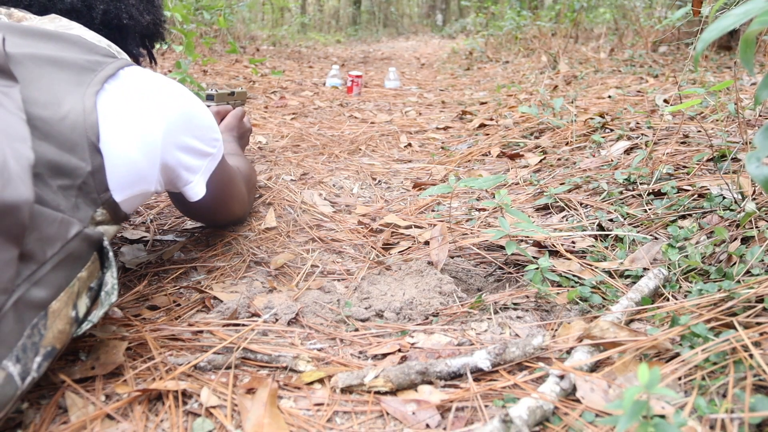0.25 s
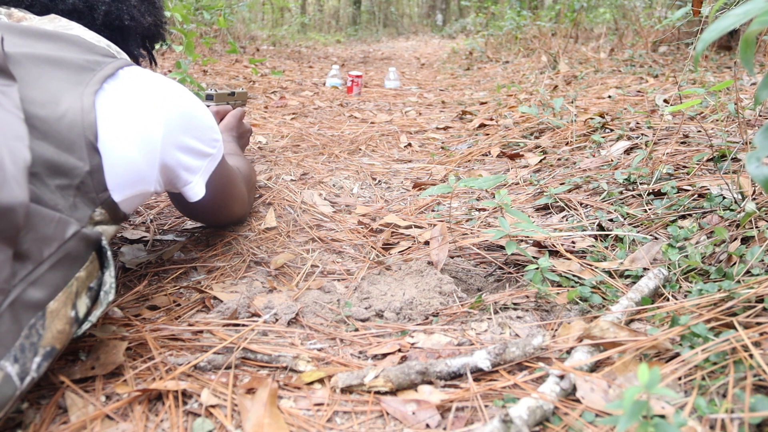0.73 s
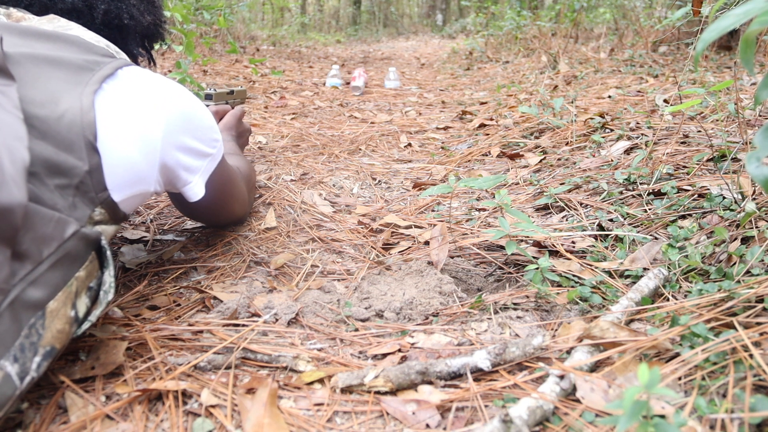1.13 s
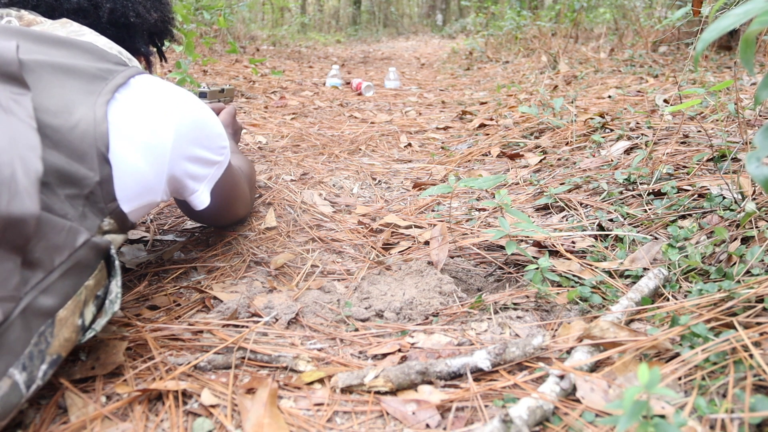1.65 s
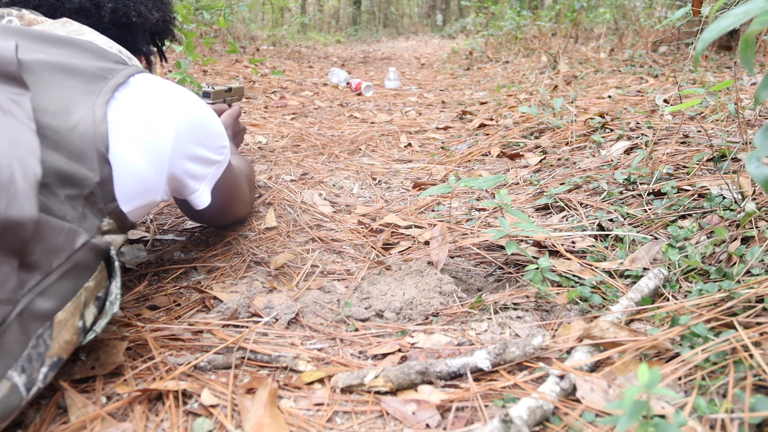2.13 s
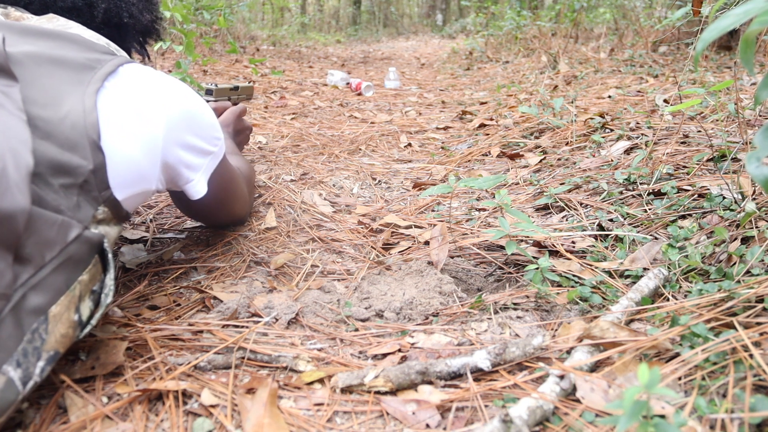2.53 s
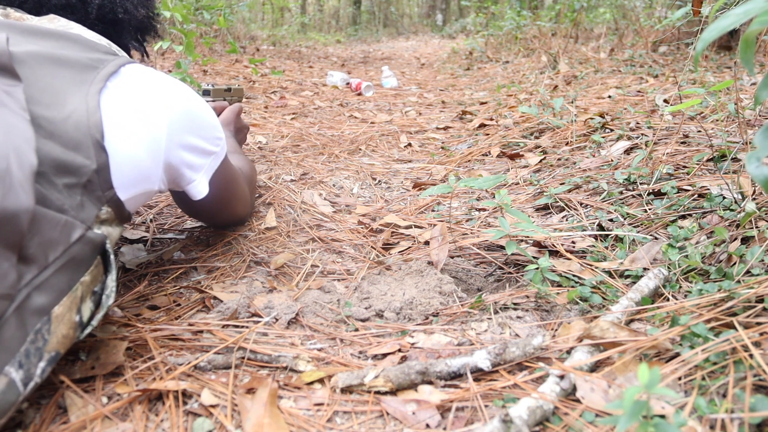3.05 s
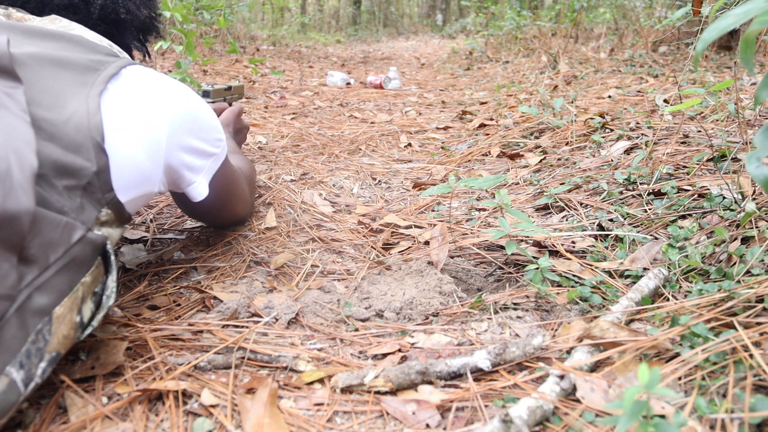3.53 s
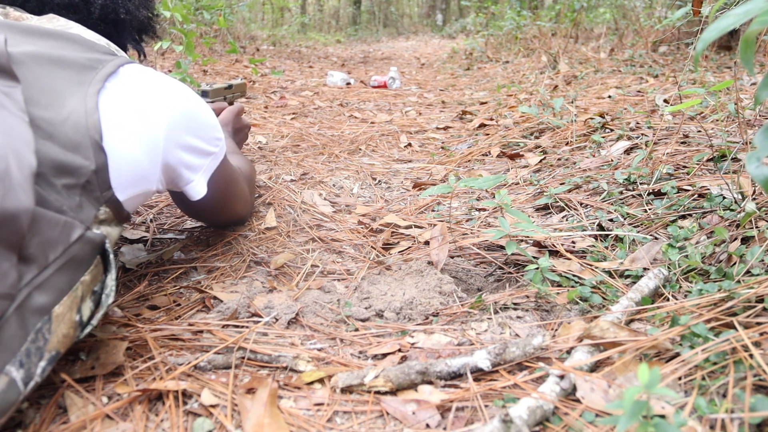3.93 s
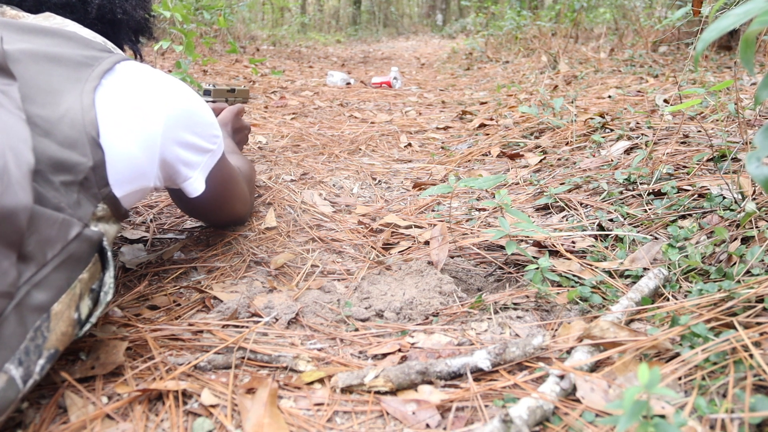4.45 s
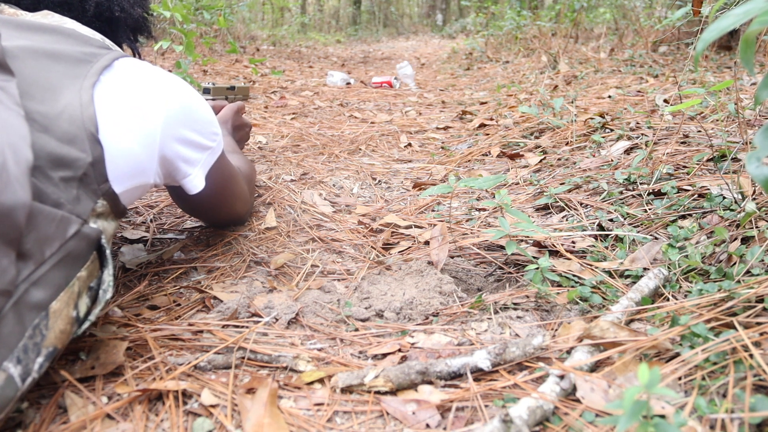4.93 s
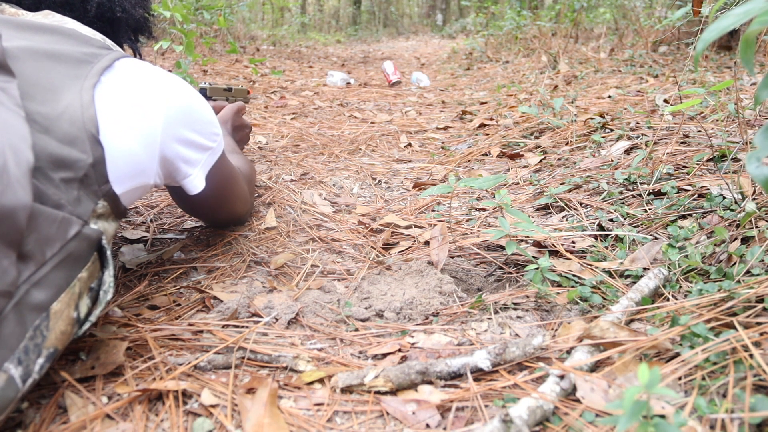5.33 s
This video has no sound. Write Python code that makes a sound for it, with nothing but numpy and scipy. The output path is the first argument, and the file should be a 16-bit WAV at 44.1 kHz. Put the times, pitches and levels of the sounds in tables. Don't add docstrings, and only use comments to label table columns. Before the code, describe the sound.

Outdoors in woods, very close to a small camera microphone, cloth rustles and a trigger scrapes over faint far traffic. A gas airsoft pistol fires three spaced sharp shots, a can tumbling and rolling over dry leaves after the first. Then about ten quick shots follow, with slide clatter, trigger clicks and pellets snapping on cans and bottles. Hissing tree echoes trail away, with small twig ticks at the end.

```python
import sys
import numpy as np
from scipy import signal
from scipy.io import wavfile
from scipy.ndimage import uniform_filter1d

SR = 44100
rng = np.random.default_rng(int(sys.argv[2]) if len(sys.argv) > 2 else 0)


def unload_audio(sound):
    columns = np.transpose(np.atleast_2d(sound))
    steps = np.round(np.clip(columns, -1, 1) * 32767)
    wavfile.write(sys.argv[1], SR, steps.astype(np.int16))


def rack_gain(trim_db):
    fader = np.asarray(trim_db, float)
    return 10 ** (fader / 20)


N = 246415

# (time [s], level [dB], hammer level [dB], echo level [dB], camera gain drop [dB])
SHOTS = [(1.0854, 1, -15.5, 8.5, 19), (1.9851, 1.5, -16, 6.5, 20), (2.7327, 2, -13, 4.5, 19),
         (3.3173, 1.5, -7, 7.5, 17), (3.5599, 1, -13, 5.5, 13.5), (3.7522, 1, -18, 6, 10.5),
         (3.9625, 1.5, -14.5, 7.5, 8), (4.1614, 0, -20, 7.5, 5), (4.3577, 0, -21, 8, 5),
         (4.577, 0, -19.5, 4.5, -0.5), (4.795, -0.5, -25.5, 7, 0.5), (5.0048, -2, -26.5, 8, -3),
         (5.2254, -1.5, -26, 8, -6.5)]
# (blowback delay [ms], blowback level [dB], rattle level [dB], pitch factor of knocks)
SLIDE = [(3.2, .3, 0.5, 1.001), (3.03, 1, -3, 1.001), (3.3, 1.5, 1, 1.001), (3.3, 1.2, .3, 1.001),
         (3.15, 1.3, -1.5, 0.994), (3, 0.5, -0.5, 1.008), (3.2, 0, -2.5, 1.001), (3.3, 0.5, 1, 1.012),
         (3.15, 0, 2, 1.001), (3.01, 0, -1, 1.001), (3.2, -0.9, 2, 1.008), (3.2, -.5, 6, 1.04),
         (3.05, -2, 10.5, 1.001)]


def band(x, hz, width):
    edges = np.clip([hz - width / 2, hz + width / 2], 10, 0.48 * SR)
    return signal.sosfilt(signal.butter(2, edges, "band", fs=SR, output="sos"), x)


def unit(x):
    return x / np.abs(x).max()


def add(out, s, x):
    i = int(round(s * SR))
    out[i:i + len(x)] += x[:len(out) - i]


def fade(t60):
    t = np.arange(int(np.clip(t60, 0.002, 2) * SR)) / SR
    return t, rack_gain(-60 * t / t60)


def swell(hz, ms, sag=0):
    t = np.arange(600) / SR * 1e3
    sag = sag + 1e-6
    cycles = hz / 1e3 * np.log1p(sag * t * 2) / sag / 2
    envelope = (t / ms) ** 0.5 * np.exp(0.5 * (1 - (t / ms) ** 2))
    return np.sin(2 * np.pi * cycles) * envelope


def burst(hz, width, t60):
    t = np.arange(3072) / SR
    noise = rng.standard_normal(3072) * rack_gain(-60 * t / max(t60, 0.002))
    return unit(band(noise, hz, width))


def walk(count):
    k = int(SR / count)
    steps = np.repeat(rng.standard_normal(N // 200)[:N // k + 1], k)[:N]
    return 0.81 * uniform_filter1d(uniform_filter1d(steps, k), k)


def on_log(table, hz):
    points = np.array(table)
    return np.interp(np.log(hz), np.log(points[:, 0]), points[:, 1])


def curve(table, *outside):
    return np.interp(np.arange(N) / SR, *np.transpose(table), *outside)


def third_octaves():
    for hz in 25 * 2 ** np.arange(0, 9.5, 1 / 3):
        yield hz, band(rng.standard_normal(N), hz, 0.25 * hz)


def gain():
    # (time [s], level [dB])
    slow_gain = [(0, 0.5), (1.08, -0.5), (1.3, -3.5), (1.95, 0), (2.2, -4), (2.7, -1.5), (3.3, -3),
                 (3.75, -6), (4.15, -13), (4.55, -16.5), (5.0, -19), (5.3, -26.5), (5.59, -24)]
    hold_s, back_s = 0.051, 0.076
    t = np.arange(N) / SR
    db = curve(slow_gain)
    for s, *_, dip_db in SHOTS:
        db -= dip_db * np.interp(t - s, [0, 0.004, hold_s, hold_s + back_s], [0.002, 1, 0.95, 0.0019])
    return rack_gain(db)


def traffic():
    # (frequency [Hz], level per Hz [dB])
    colour = [(13, -48), (22, -27), (109, 1), (147, -10), (223, -8), (263, -17.5), (356, -24), (569, -34),
              (672, -24.5), (988, -26.5), (1580, -31.5), (1860, -55), (16000, -57)]
    far, slow = np.zeros(N), walk(1)
    for hz, noise in third_octaves():
        far += rack_gain(on_log(colour, hz) + slow / 2 + 2 * walk(14) * min(300 / hz, 1)) * noise
    return far * rack_gain(-33.5) / far.std()


def tree_echo():
    # (frequency [Hz], level per Hz [dB])
    colour = [(180, -53), (300, -21), (828, -12.5), (1120, -7.5), (1250, -12), (2280, -13), (3830, -4.5),
              (4520, -1.5), (4910, -10), (13800, -12.5), (16000, -20)]
    # (frequency [Hz], time [s])
    fading = [(400, 1.34), (1500, 1.4), (4000, 0.88), (14000, 0.58)]
    # (frequency [Hz], width [Hz], level [dB])
    barrel = [(1100, 150, -24), (2840, 160, -29), (3660, 380, -15.5), (3910, 220, -20.5), (4690, 380, -21)]
    kicks = np.zeros(N)
    kicks[[int((shot[0] + 0.008) * SR) for shot in SHOTS]] = rack_gain(2 * np.array(SHOTS)[:, 3])

    def decay(hz):
        return np.sqrt(signal.lfilter([1], [1, -rack_gain(-120 / SR / on_log(fading, hz))], kicks))

    echo = np.zeros(N)
    for hz, noise in third_octaves():
        echo += rack_gain(on_log(colour, hz) - 13 + 2.35 * walk(30)) * decay(hz) * noise
    for hz, width, db in barrel:
        echo += rack_gain(db) * decay(hz) * band(rng.standard_normal(N), hz, width)
    return echo * rack_gain(1.2 * walk(100))


def bird():
    # (time [s], pitch [Hz], level [dB])
    chirp = [(.714, 6600, -82), (.722, 7300, -64), (.732, 7650, -69), (.745, 7400, -78), (.768, 7600, -72),
             (.78, 7100, -76), (.79, 6500, -84)]
    s, hz, db = np.transpose(chirp)
    turns = np.cumsum(curve(np.transpose([s, hz]))) / SR
    return rack_gain(curve(np.transpose([s, db]), -120, -120)) * np.sin(2 * np.pi * turns)


def sleeve():
    # (time [s], level [dB])
    rustle = [(0, -62.5), (.28, -70), (.36, -58), (.46, -59.5), (.54, -63), (.7, -68), (.74, -69),
              (.82, -59), (.9, -63.5)]
    return rack_gain(curve(rustle) + 1.6 * walk(70)) * band(rng.standard_normal(N), 2980, 2100) * 3


def ground_thuds():
    # (time [s], peak level [dB], frequency [Hz])
    thuds = [
        (0.033, -32, 524),
        (0.146, -35, 504),
        (0.181, -32.5, 560),
        (0.226, -35, 517),
        (5.4874, -50, 620),
    ]
    out, t60 = np.zeros(N), 0.05
    for s, db, hz in thuds:
        add(out, s, rack_gain(db + 0.5) * burst(hz, 0.54 * hz, t60))
        add(out, s, rack_gain(db - 14) * burst(2250, 1000, 0.5 * t60))
    return out


def tick(out, s, db, hz, top_db, top_hz, t60, wide):
    edge = burst(top_hz, 0.29 * top_hz, 0.83 * t60) + burst(13000, 7800, 0.56 * t60)
    add(out, s, rack_gain(db - 0.5) * burst(hz, wide * hz, t60) + rack_gain(top_db + 1.5) * edge)
    add(out, s, rack_gain(db - 1) * swell(hz, 0.25) - rack_gain(top_db - 1) * swell(top_hz, 0.12))


def twigs():
    # (time [s], peak level [dB], frequency [Hz], treble level [dB], treble frequency [Hz])
    snaps = [(0.082, -43, 2250, -64, 7290), (0.2954, -46, 1920, -62, 6870), (0.456, -46, 3560, -50, 9500),
             (0.6885, -47, 2100, -60, 6020), (0.719, -54, 4500, -62, 9000), (5.4612, -36, 1900, -42, 3900),
             (5.4887, -35, 2160, -44.5, 6800), (5.528, -40, 3420, -58, 9220), (5.536, -48, 2980, -40, 8050),
             (5.5782, -35.5, 2150, -41, 9400)]
    out = np.zeros(N)
    for row in snaps:
        tick(out, *row, t60=0.029, wide=0.78)
    return out


def tumbling_can():
    # (time [s], peak level [dB], frequency [Hz], treble level [dB], treble frequency [Hz])
    bumps = [(1.1718, -20, 3890, -17, 7760), (1.204, -19, 3540, -21.5, 6330), (1.215, -24, 4200, -22, 6460),
             (1.285, -28, 3000, -25, 10500), (1.3046, -26, 3630, -16.5, 6860),
             (1.311, -32, 3600, -24.5, 6800), (1.36, -20.5, 3300, -28, 5240),
             (1.411, -18.5, 3330, -26, 6800), (1.4153, -24, 4300, -34.5, 7500),
             (1.492, -51, 3700, -30, 8950), (1.4945, -45, 3710, -17, 7440), (1.5274, -46, 2280, -42, 6340),
             (1.574, -46, 3420, -38, 7020), (1.5976, -44, 2270, -41, 7400), (1.608, -32, 4120, -34, 7000),
             (1.6244, -45, 2620, -51, 6500), (1.676, -39.5, 4110, -50, 5500),
             (1.7273, -33, 3080, -41, 6550), (1.744, -39, 3800, -45, 9500), (1.765, -41, 4120, -52, 6080),
             (1.781, -40, 4500, -48, 6000), (1.7878, -29, 3280, -33, 6000), (1.7915, -34, 3600, -41, 5500),
             (1.8214, -28, 2400, -42, 7580), (1.8275, -27, 2970, -41, 9200), (1.845, -32, 3600, -48, 7550),
             (1.87, -46, 3900, -50, 6500), (1.8886, -37, 3000, -51, 5500), (1.911, -32.5, 2250, -37, 7500),
             (1.931, -41, 4000, -51, 6000), (2.089, -40, 4000, -33, 8000), (2.188, -40, 4000, -32, 6950)]
    out = np.zeros(N)
    for row in bumps:
        tick(out, *row, t60=0.026, wide=0.78)
    return out


def rolling():
    # (time [s], level [dB])
    roll = [(1.44, -80), (1.5, -58), (1.58, -50), (1.64, -54), (1.7, -65), (1.79, -55), (1.88, -64),
            (1.95, -54), (1.99, -49)]
    chance, size = rng.random(N), rng.exponential(size=N)
    hits = (chance < 550 / SR) * rack_gain(4.1 * np.minimum(size, 2.5))
    snaps = signal.lfilter([1], [1, -rack_gain(-60 / SR / 0.018)], hits) * rng.standard_normal(N)
    leaves = band(snaps, 7200, 3000) + 0.43 * band(snaps, 10000, 8700) + 2.1 * band(snaps, 2700, 2200)
    hum = 25 * band(snaps, 1340, 63) + 9 * band(snaps, 2280, 120) + 9 * band(snaps, 1960, 100)
    freed = np.clip(np.arange(N) / SR - roll[0][0], 0, 1)
    return rack_gain(curve(roll, -120, -120)) * (leaves + rack_gain(-9.5 + 3 * freed) * hum)


def shells(g):
    # (time [s], frequency [Hz], level [dB], time to fade by 60 dB [s])
    rings = [(1.103, 976, -38, 0.3), (1.101, 1448, -47, 0.3), (1.101, 2600, -46, .3),
             (1.361, 1335, -24, 0.13), (1.36, 1100, -46, .2), (1.361, 1960, -35, 0.15),
             (1.41, 1075, -35.5, 0.17), (1.412, 1520, -32.5, 0.14), (1.412, 1340, -33, 0.13),
             (1.41, 2590, -36, 0.12), (1.822, 1340, -36, 0.175), (2.005, 1060, -27, .05),
             (2.013, 1960, -25, .05), (2.753, 397, -29, 0.097), (2.752, 740, -29, .12),
             (2.7518, 1060, -15, .05), (3.333, 1595, -35, 0.3), (3.345, 994, -42, 0.24),
             (4.377, 980, -27, .19), (4.378, 1270, -38, 0.2), (4.815, 400, -29, 0.1),
             (4.816, 750, -29.5, 0.11), (5.024, 896, -28.5, 0.2), (5.022, 976, -26.5, 0.19),
             (5.024, 1573, -29, 0.2), (5.246, 894, -33, 0.14), (5.487, 913, -41.5, 0.12),
             (5.488, 1495, -40, 0.13)]
    spin_t60, spin_s, spin_depth, spin_bend = 0.18, 0.037, 0.34, 1.52
    out, waver = np.zeros(N), 0.006 * walk(45)
    for s, hz, db, t60 in rings:
        i = int(s * SR)
        t, env = fade(t60)
        if t60 > spin_t60:
            env = rack_gain(-60 * (t / t60) ** spin_bend) * (1 - spin_depth * np.exp(-(t / spin_s) ** 2))
        bent = np.cumsum(1 + np.resize(waver[i:], len(t))) / SR
        detune, phase = 1.01 + 0.02 * rng.random(), rng.random()
        pair = np.sin(2 * np.pi * hz * bent * (1 + 0.08 * t))
        pair += 0.36 * np.sin(2 * np.pi * (hz * detune * bent + phase))
        add(out, s, rack_gain(db) / g[i] * env * pair)
    return out * rack_gain(3.1 * walk(70))


def scrape(out, s, db, top_db, slide_db, knock_db):
    # (frequency [Hz], level [dB], time to fade by 60 dB [s])
    tones = [(1960, -9, 0.043), (2250, -13, 0.018), (3000, -23, 0.05), (3175, -14.5, 0.05),
             (3720, -15, 0.02), (4704, -16, 0.034), (7300, -16, 0.014), (9868, -17, 0.014)]
    bump = np.hanning(240)
    rub = rng.standard_normal(240) * bump / 28
    varied = np.array(tones) + rng.standard_normal((len(tones), 3)) * [14, 1.5, 0]
    for hz, tone_db, t60 in varied:
        t, env = fade(t60)
        push = rub + bump / 48 * np.cos(2 * np.pi * hz * np.arange(240) / SR)
        ring = np.convolve(env * np.sin(2 * np.pi * hz * t), push)
        part_db = db if hz < 2500 else db + slide_db if hz < 3400 else top_db
        add(out, s - 0.002, rack_gain(part_db + tone_db - 1) * ring)
    add(out, s, rack_gain(top_db) * burst(7800, 13300, 0.02) + rack_gain(db + knock_db) * burst(2670, 1100, 0.024))


def trigger_take_up():
    # (time [s], peak level [dB], treble level [dB], slide ring against the peak [dB])
    pulls = [(0.8256, -17.5, -19, 5), (0.83, -25, -25, 5), (0.839, -33, -39, 12), (2.6695, -17, -24, -12),
             (2.6874, -17.5, -27, -11.5), (3.252, -37, -28, -3), (3.2599, -25, -20, -7),
             (3.2767, -19, -35, 1), (3.344, -23, -32, -4), (3.526, -17, -19, -14), (3.538, -23, -33, -12.5),
             (3.726, -15, -28, -13), (5.135, -20.5, -29, -10)]
    out = np.zeros(N)
    for row in pulls:
        scrape(out, *row, knock_db=-5)
    return out


def trigger_rebound():
    # (time [s], peak level [dB], gap to the second [ms], second peak level [dB])
    bounces = [(3.592, -23, 24, -21.5), (3.787, -24, 26, -23.5), (3.996, -20, 24, -25),
               (4.193, -17, 25, -23.5), (4.388, -15, 26.5, -20.5), (4.609, -19.5, 23.5, -20),
               (4.8303, -25, 21.5, -25)]
    out = np.zeros(N)
    for first_s, first_db, gap_ms, second_db in bounces:
        for s, db, treble_db in ((first_s, first_db, -24), (first_s + gap_ms / 1e3, second_db, -2)):
            scrape(out, s, db, db + treble_db, slide_db=-10, knock_db=-16)
            add(out, s - 0.007, rack_gain(db - 12.5) * burst(883, 0.34 * 883, -0.4))
    return out


def trigger_ticks():
    # (time [s], peak level [dB], frequency [Hz])
    sear = [(1.063, -45, 3600), (1.068, -40, 2200), (3.509, -27, 2400), (3.916, -34, 2400),
            (3.94, -26, 2120), (4.1398, -28, 2097), (4.339, -24, 2900), (4.526, -35, 2100),
            (4.554, -29.5, 3000), (4.595, -26, 3000), (4.742, -40, 2000), (4.762, -31, 2800),
            (4.773, -36, 2100), (4.985, -33, 2900), (5.1085, -40, 2200), (5.204, -33, 2800)]
    # (time [s], peak level [dB], gap [ms], second peak level [dB], second frequency [Hz])
    reset = [(1.25, -16.5, 28, -15.5, 2610), (2.142, -18, 26, -11, 3100), (2.8873, -15.5, 25.4, -9.5, 3470),
             (3.4337, -19.5, 23.6, -9.5, 3500), (3.6488, -19.5, 25.6, -14.5, 3340),
             (3.8562, -19.5, 26, -20.5, 2970), (4.0524, -21.5, 23, -25, 2860),
             (4.256, -25, 24, -23.5, 3660), (4.4672, -29.5, 22, -26, 3000), (4.6814, -31.5, 23, -27, 2950),
             (4.8923, -32.5, 26, -37, 4000), (5.3403, -41.5, 32, -38, 2430)]
    out = np.zeros(N)
    for s, db, hz in sear:
        tick(out, s, db, hz, db - 14.5, 9001, t60=0.018, wide=0.3)
    for s, db, gap_ms, catch_db, catch_hz in reset:
        tick(out, s, db, 2164, db - 9, 9200, t60=0.03, wide=0.22)
        tick(out, s + gap_ms / 1e3, catch_db, catch_hz, catch_db - 5, 7200, t60=0.016, wide=0.7)
    return out


def pellets():
    # (time [s], snap level [dB], thud frequency [Hz], crack level [dB], crack frequency [Hz])
    cans = [(1.1004, -1.5, 617, -7.5, 4100), (2.0031, 3, 475, -15, 1420), (3.3338, 2, 537, -12, 2960),
            (4.3762, 0, 646, -14, 4030), (5.023, 3, 650, -8.5, 3700)]
    # (time [s], snap level [dB], thud frequency [Hz], crack level [dB], crack frequency [Hz])
    bottles = [(2.7519, -3.5, 845, -11, 1100), (4.181, -7.5, 591.5, -20, 3500),
               (4.8143, 3, 655, -6.5, 3010), (4.816, -5, 910, -13, 3500), (5.2448, -8, 925, -3, 8350)]
    out = np.zeros(N)
    for hits, wall_t60 in ((cans, 0.05), (bottles, 0.02)):
        for s, db, hz, crack_db, crack_hz in hits:
            t60 = wall_t60 * min(1, 4100 / crack_hz)
            add(out, s - 0.0001, -rack_gain(db) * np.hanning(9))
            add(out, s + 0.0001, rack_gain(db - 6.5) * swell(1.55 * hz, 300 / hz, 0.47))
            crack = burst(crack_hz, min(0.97 * crack_hz, 2200), t60) + 1.35 * burst(10000, 7500, 0.23 * t60)
            add(out, s, rack_gain(crack_db) * crack)
    return out


def hammer():
    out = np.zeros(N)
    for s, _, db, *_ in SHOTS:
        add(out, s - 0.007, rack_gain(db - 10.5) * burst(5400, 9700, 0.026))
        add(out, s - 0.0048, rack_gain(db) * (burst(2700, 1800, 0.048) + 0.15 * burst(9000, 9000, 0.019)))
    return out


def gas_pops():
    out = np.zeros(N)
    for k, ((s, db, *_), (back_ms, back_db, *_)) in enumerate(zip(SHOTS, SLIDE)):
        muzzle_db = 3.5 - 0.56 * k
        add(out, s + 0.14e-3, rack_gain(db - 3 + muzzle_db) * swell(557, 0.63, 0.03))
        add(out, s + back_ms / 1e3, rack_gain(db - 5 + back_db) * swell(684.5, 1.43, 0.21))
    return out


def body_knocks():
    # (delay [ms], frequency [Hz], swell time [ms], level [dB])
    knocks = [(0.34, 2240, 0.34, -8), (0.57, 3655, 1.75, -5), (1.27, 2710, 0.49, -5),
              (1.451, 3690, 0.58, -6.5), (3.05, 2400, 0.51, -0.5), (3.2, 3620, 0.3, -13),
              (4.75, 3840, 0.47, -10.5), (4.7, 3300, 0.82, -26.5), (4.36, 1690, 1, -22),
              (1.025, 1070, 0.21, -16), (4.81, 1034, 1.6, -22), (6.5, 3680, 1.3, -22.5),
              (10, 2700, 0.32, -16.5), (7, 2900, 0.74, -15), (8.2, 3860, 0.86, -17)]
    out, slide_ms = np.zeros(N), 3
    for (s, db, *_), (back_ms, _, _, pitch) in zip(SHOTS, SLIDE):
        for ms, hz, rise_ms, knock_db in knocks:
            late, louder, higher = rng.standard_normal(3) * [0.03, 2, 0.029]
            delay_ms = ms + late + (back_ms - slide_ms) * (ms >= slide_ms)
            knock = swell(hz * pitch * (1 + higher), rise_ms)
            add(out, s + delay_ms / 1e3, rack_gain(db + knock_db + louder) * knock)
    return out


def hiss_and_rattle():
    # (delay [ms], time to fade by 60 dB [ms], level [dB])
    bursts = [(1, 4, -15.5), (5.5, 19, -21.5), (-0.03, 22.5, -2), (0.46, 25, -4.5), (9, 8.3, -15),
              (14, 120, -44.5), (19, 36, -31.5), (25, 26, -31)]
    out = np.zeros(N)
    for (s, db, *_), (_, _, rattle_db, _) in zip(SHOTS, SLIDE):
        for ms, t60_ms, hiss_db in bursts:
            t60 = t60_ms / 1e3
            noise = burst(9220, 11260, t60) + 0.64 * burst(2830, 2540, t60) + 0.24 * burst(1066, 1100, t60)
            add(out, s + ms / 1e3, rack_gain(db + hiss_db + rattle_db * (ms > 4)) * noise)
    return out


def scene():
    g = gain()
    shots = hammer() + gas_pops() + body_knocks() + hiss_and_rattle() + pellets()
    near = signal.lfilter(*signal.butter(2, 90, "high", fs=SR), shots)
    near += trigger_take_up() + trigger_rebound() + trigger_ticks()
    near += tumbling_can() + twigs() + ground_thuds()
    background = traffic() + tree_echo() + sleeve() + bird()
    return (near / g + shells(g) + rolling() + background)[None]


def roll_off(x):
    return signal.sosfilt(signal.butter(12, 16410, fs=SR, output="sos"), x)


def record(dry):
    x = signal.sosfilt(signal.ellip(6, 0.2, 40, 15700, fs=SR, output="sos"), dry * gain())
    x = np.clip(x, -1.05, 1.05)
    x = signal.sosfilt(signal.butter(3, 15200, fs=SR, output="sos"), x)
    return roll_off(np.clip(x, -1, 1))


dry = scene()
out = record(dry)
unload_audio(out)
```